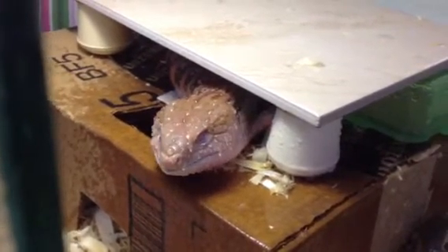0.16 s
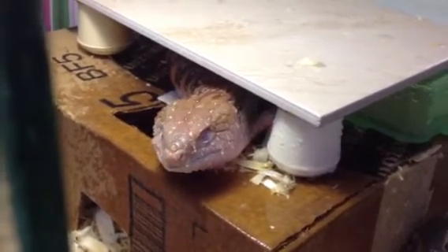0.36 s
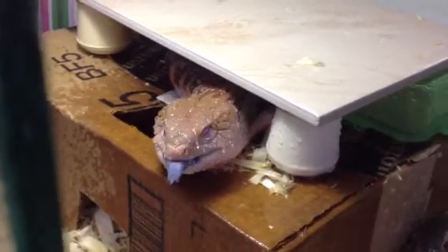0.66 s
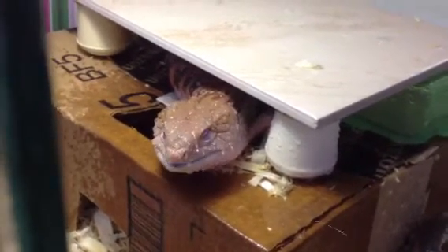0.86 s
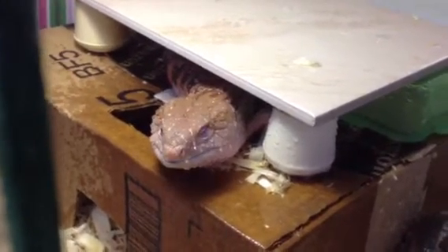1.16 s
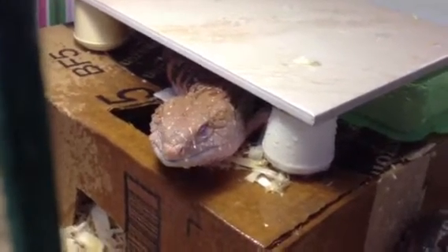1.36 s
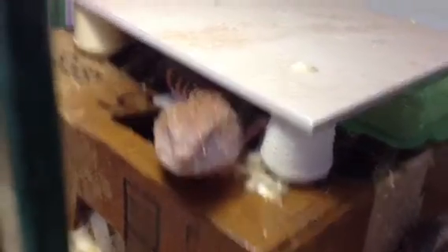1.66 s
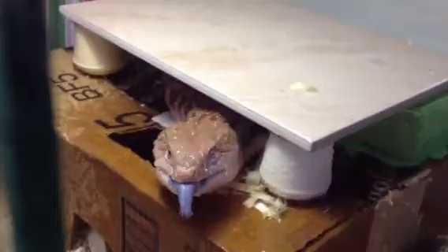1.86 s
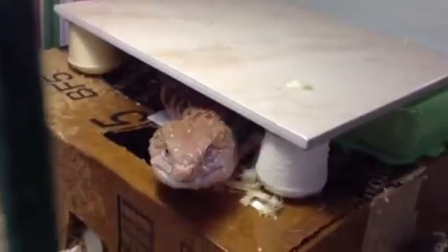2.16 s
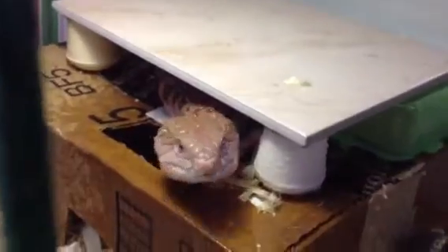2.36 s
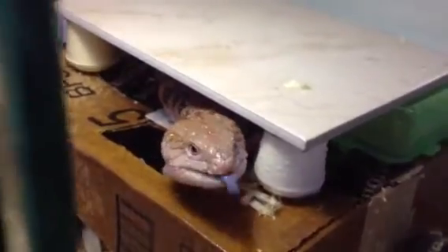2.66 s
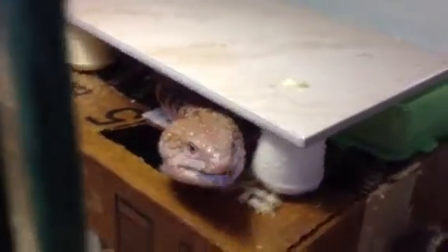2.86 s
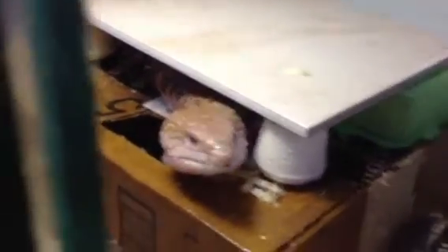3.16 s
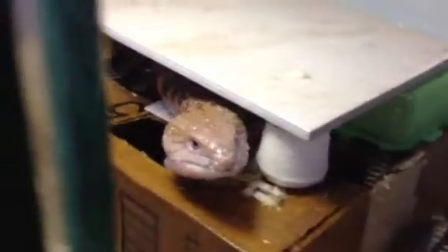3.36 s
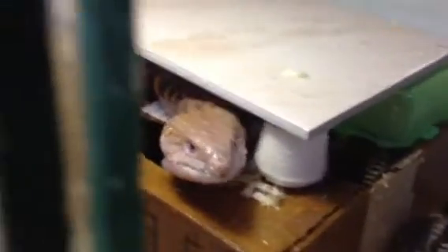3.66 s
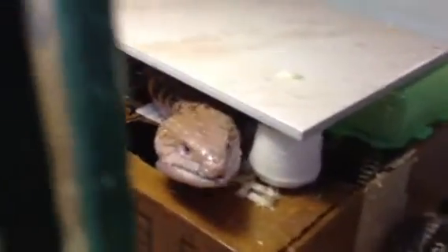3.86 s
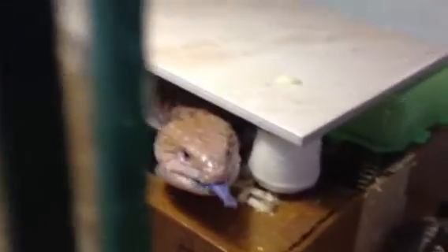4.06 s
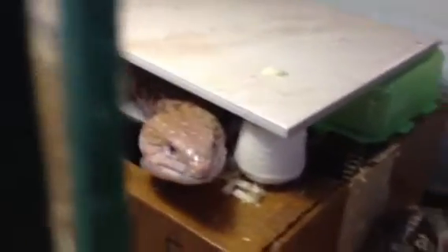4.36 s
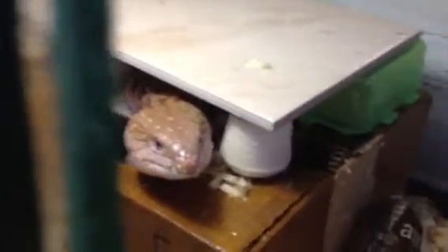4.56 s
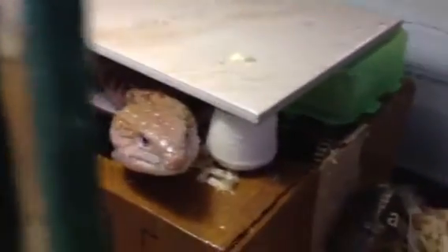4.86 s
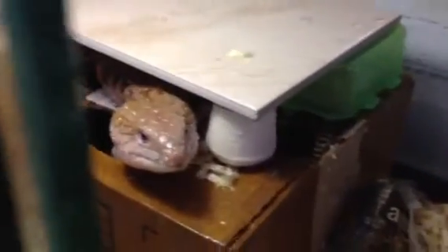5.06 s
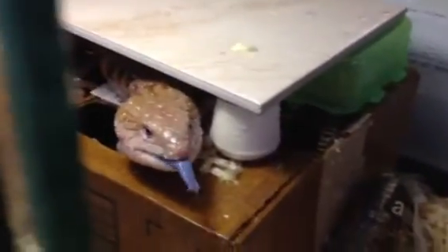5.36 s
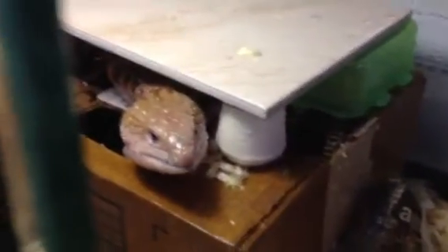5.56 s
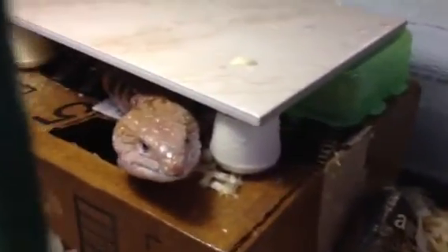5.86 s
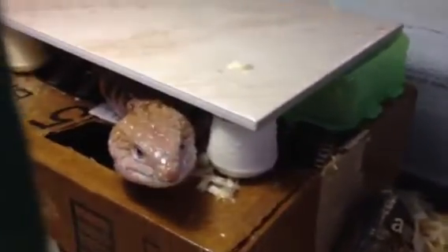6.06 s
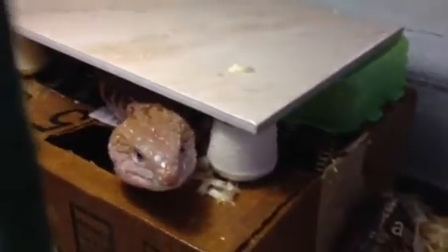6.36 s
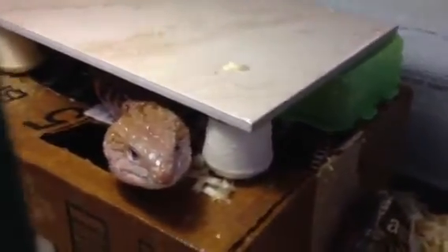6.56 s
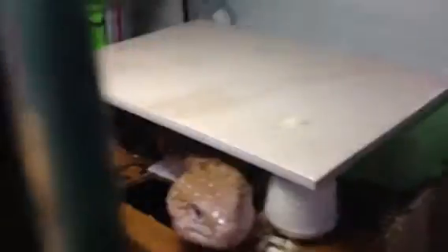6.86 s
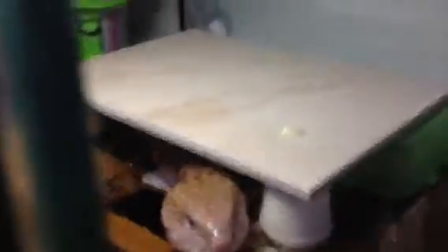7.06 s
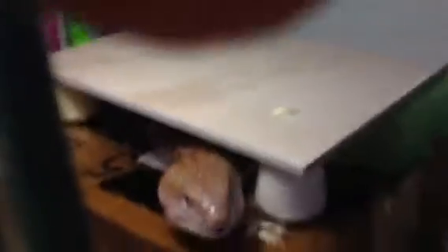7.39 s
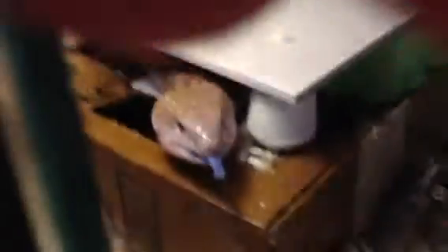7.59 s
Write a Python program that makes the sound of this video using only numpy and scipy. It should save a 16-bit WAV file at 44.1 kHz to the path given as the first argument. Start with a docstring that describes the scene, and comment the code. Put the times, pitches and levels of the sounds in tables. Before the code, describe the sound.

A close capture in a small, slightly reverberant room with a faint steady background. From 0 to 2.5 seconds a hand sprayer gives a smooth, constant, fairly quiet hiss of fine mist, with two soft low taps near 0.4 and 0.5. The valve shuts and the hiss stops quickly. Around 2.6 to 2.9 the plastic bottle is set down in a sharp, loud, tumbling clatter with short scuffs. From 3.3 to 5.0 it is pumped six times, roughly three strokes a second: each has a small click, a rush of rubbing air with a thin, very high whistle and chirp, a loud hollow knock at the bottom, and a rebound click; softer air swishes on the upstrokes, and a few strokes groan briefly. Afterwards come sparse light ticks and faint scuffs, then a firm hollow knock on the enclosure near 7.0 and a lighter one just after, followed by near quiet.

```python
"""A pump-up pressure sprayer is set down with a clatter and pumped six times after misting an enclosure.
Each stroke joins modal impacts (turn, catch, stop, rebound) with seal chirps, a whistle and rushing air.
Before the pumping, the mist is smooth coloured noise, with two soft taps, until the valve shuts.
Contact snaps and ringing modes make the handling ticks and two hollow knocks; scuffs are shaped noise.
Early reflections, a diffuse echo and steady coloured noise make the small room."""
import sys
import numpy as np
from scipy import signal
from scipy.fft import rfft, irfft, next_fast_len
from scipy.io import wavfile

SR = 44100
rng = np.random.default_rng(int(sys.argv[2]) if len(sys.argv) > 2 else 0)


def unload_wav(signal):
    """Save mono or channel-first audio to the path in sys.argv[1] as 16-bit WAV at rate SR, clipped to [-1, 1]."""
    wavfile.write(
        sys.argv[1],
        SR,
        np.round(np.clip(np.atleast_2d(signal).T, -1, 1) * 32767).astype(np.int16),
    )


N = 340893
TIME = np.arange(N) / SR   # s

# pump strokes: [handle turns t/s, plunger stops t/s, rubbing level/dB,
#   nominal peak level/dB of turn, catch, stop and rebound,
#   rising chirp level/dB, lead of the falling chirp before the stop t/s]
PUMP_STROKES = [(3.293, 3.405, -46, -52, -22, -10.5, -32, -45, 0.028),
                (3.672, 3.774, -45, -22, -21, -1, -13, -34.5, 0.014),
                (3.987, 4.091, -43, -27, -23.5, -2, -18, -42, .015),
                (4.272, 4.376, -42.5, -24, -21.5, -2.5, -24, -49.5, 0.013),
                (4.57, 4.688, -40.5, -24, -18.5, -7.5, -20.5, -53.5, 0.027),
                (4.878, 4.9847, -42.5, -32.5, -19, -1.5, -26, -50, 0.025)]
# after the turn the seal grips, then catches; after the stop the rod overruns and rebounds
GRIP_S, CATCH_S = 0.018, 0.038
OVERRUN_S, REBOUND_S = 0.012, 0.029
# the way up starts after a rest and ends just before the next turn
REST_S, PULL_GAP_S, PULL_DB = 0.08, 0.01, -50.5

# modes of the pump barrel, the bottle's shell and the enclosure:
# [f/Hz, level/dB, t60/s], level, pitch and decay before each contact's own variation and ring scale
BARREL_MODES = [(219.8, -6, 0.16), (255.1, -13.5, 0.34), (339.6, 3, 0.11), (413, -6.5, .07),
                (630, -4, 0.049), (708.6, 0.5, 0.095), (815, 5, 0.087), (903, 0.5, 0.12),
                (1017, -1.5, 0.093), (1381, -2, 0.031), (1670, -6, 0.022), (2607, 0.5, 0.042),
                (2846, 1, 0.023), (3540, -10.5, 0.022), (4490, -10.5, .035)]
SHELL_MODES = [(187, -10, 0.16), (323, -10.5, 0.14), (675, -2, 0.045), (955, 1, 0.095), (1021, -3.5, 0.067),
               (1280, -6, 0.063), (1818, -2, 0.054), (2170, 1, 0.02), (2630, -2.5, 0.023), (2553, 8, 0.076),
               (2745, 7, 0.02), (3390, 0, 0.064), (4090, 0, 0.035), (4313, -22, 0.017), (5420, -22, 0.028),
               (6195, 1, 0.049)]
ENCLOSURE_MODES = [(372, -3, 0.13), (663, -6, 0.054), (684, 11, 0.055), (1173, -7, 0.16), (1344, -14, 0.11),
                   (2010, -8, 0.074), (2730, 0, 0.045), (3930, -3.5, 0.036), (4840, -20, 0.036)]
# limits of the bands that set a contact's colour: [f/Hz]
BAND_EDGES_HZ = [100, 500, 1800, 4300, 15500]
# colour of each contact before its brightness tilt: [bass, middle, presence, treble level/dB]
STOP_BANDS = [-4.5, 0.5, -6, -12]
REBOUND_BANDS = [-4, -0.5, 0, -8]
TURN_BANDS = [1, -2.5, -10, -22.5]
CATCH_BANDS = [-6.5, -1.5, 0.5, -8.5]
CLACK_BANDS = [-7, 0.5, 1.5, -14]
KNOCK_BANDS = [-4.5, 1.5, -16, -31.5]

# the bottle's thump under each stop: [f/Hz, level/dB, t60/s], before the stroke's level
THUMP_MODES = [(205.4, -21, 0.19)]
THUMP_FADE_DB_PER_STROKE = 4   # pressure cushions the plunger
THUMP_FOLLOWS = 0.5   # share of the stop's level in dB

# spectra of air passing the seal on the way down and up: [f/Hz, relative level/dB]
PUSH_SPECTRUM = [(30, -39), (100, -0.5), (160, 10), (300, 9), (550, 3.5), (800, 5), (1200, -10), (1850, 2),
                 (2200, -7.5), (4200, -2.5), (6700, -9.5), (10500, -11.5), (13200, -9), (15500, -14.5)]
PULL_SPECTRUM = [(40, -21.5), (150, 8), (500, -2.5), (880, 1.5), (1200, -3.5), (2000, 1), (4200, 2.5),
                 (5300, -3), (6900, 1), (8500, -8.5), (10500, -12), (11700, -7.5), (12700, 2),
                 (13800, -15.5), (15500, -11.5)]
# the seal's chirps: (from Hz, to Hz), before a small waver
CHIRP_UP_HZ = (12300, 13300)
CHIRP_DOWN_HZ = (13100, 12030)
CHIRP_S, CHIRP_DOWN_DB = 0.021, -34
CHIRP_UP_LEAD_S = 0.02   # before the catch
# groans of the seal: [start t/s, length t/s, from f/Hz, to f/Hz, level/dB], pitch before waver
SEAL_GROANS = [(3.345, 0.065, 535, 560, -49.5), (3.61, 0.065, 338, 298, -44), (4.616, .09, 520, 607, -36)]

# mist from the nozzle until the valve shuts: [t/s, level/dB], before a slight flutter
MIST_LEVEL = [(0, -48), (.3, -49), (.37, -46.5), (.44, -48.5), (.9, -48.5), (1.6, -49.5), (2.47, -49.5),
              (2.5, -51), (2.53, -67), (2.6, -110)]
# spectrum of the mist: [f/Hz, relative level/dB]
MIST_SPECTRUM = [(150, -38.5), (300, -7.5), (480, -5), (780, -5.5), (1000, -7.5), (1500, -2.5),
                 (2600, -1.5), (4100, -2.5), (5200, -6.5), (7000, -2), (10000, -6), (15000, -6)]

# clatter and ticks of the handled bottle, and at 3.821 s a second rebound of the plunger: [t/s, nominal peak
# level/dB, brightness level/dB per band]
HANDLING_CLACKS = [(2.637, -26.5, -2.5), (2.731, -23, 5), (2.763, -2.5, 4.5), (2.785, -7.5, 2.5),
                   (2.797, -6, -1), (2.831, -17.5, -2), (2.85, -20.5, -4.5), (2.87, -8.5, 3.5),
                   (2.964, -22, 0), (3.15, -28.5, -5), (3.496, -29, 1), (3.756, -16, -6), (3.821, -20, 7),
                   (5.128, -23.5, 1), (5.177, -32, -7), (5.276, -36.5, -4), (5.377, -22.5, 8.5),
                   (5.465, -37.5, -2), (5.606, -36, -1), (5.696, -34.5, -.5), (6.145, -29, -6),
                   (6.245, -46.5, 17), (6.606, -41.5, -4.5), (6.751, -39.5, -6.5), (6.789, -43, 10),
                   (7.025, -35.5, -1.5)]
# the bottle scuffs along its support and in the hand: [start t/s, end t/s, level/dB], before flutter
SCUFF_STROKES = [(2.54, 2.73, -59.5), (2.72, 2.765, -41), (2.775, 2.875, -46), (5.37, 5.46, -51.5),
                 (5.62, 6.15, -65.5), (7.17, 7.26, -66)]
# spectrum of the scuffs: [f/Hz, relative level/dB]
SCUFF_SPECTRUM = [(30, -45), (100, -6), (190, 7), (400, 5.5), (800, -6), (1050, -5.5), (1600, -1),
                  (2500, 3.5), (3100, -5), (4200, -4), (6800, -10.5), (10000, -14), (15500, -17)]
# heavy contacts shake the surface under the bottle: [t/s, level/dB], before each mode's level
SUPPORT_BUMPS = [(.437, -36.5), (.511, -46), (2.755, -26.5), (2.791, -31.5), (2.869, -31.5), (3.757, -28),
                 (6.148, -49), (6.987, -43)]
# modes of that surface: [f/Hz, level/dB, t60/s]
SUPPORT_MODES = [(95, -10.5, 0.25), (151.1, -1, 0.27), (231, 3.5, 0.12)]
# hollow knocks on the enclosure: [t/s, nominal peak level/dB, brightness level/dB per band]
ENCLOSURE_KNOCKS = [(6.984, -16, 1.5), (7.071, -24, 0.5)]
# two soft taps during the misting: [t/s, level/dB, f/Hz]
SOFT_TAPS = [(.43, -31.5, 400), (.509, -33, 974)]
TAP_T60_S = 0.039

# small nearby surfaces throw back the treble: [delay t/s, level/dB]
EARLY_REFLECTIONS = [(.0011, -24), (.0019, -18), (.0031, -18), (.0047, -16.5), (.0073, -22.5)]
# decay of the room: [f/Hz, t60/s]
ROOM_DECAY = [(150, 0.84), (350, 0.26), (900, 0.4), (3000, 0.4), (7000, 0.4), (12500, 0.9)]
# colour of the room's echo: [f/Hz, level/dB], before the echo's overall level
ECHO_COLOUR = [(80, 1), (190, 1.5), (350, -1.5), (880, -3), (1400, -7), (3000, -1.5), (12000, -6.5)]
ECHO_DB = -13
# spectrum of the room's background: [f/Hz, relative level/dB]
ROOM_SPECTRUM = [(20, -59), (40, -31), (95, -11), (150, -6), (240, -4), (450, -13.5), (900, -12),
                 (1200, -18), (3000, -25.5), (7000, -26), (10000, -27.5), (15500, -27)]
ROOM_TONE_DB = -62.5
# resonances of the microphone's port: [f/Hz, width f/Hz, level/dB at the centre]
PORT_RESONANCES = [(5216, 360, -4), (6800, 340, 2.5), (10000, 1800, -4)]
CUTOFF_HZ = 15450


def pump_contacts():
    """Modal impact: each stroke has a dull turn, a catch, a knock on the stop and a rebound."""
    turn, stop, _, turn_db, catch_db, stop_db, rebound_db, *_ = np.transpose(PUMP_STROKES)
    even = np.zeros(len(PUMP_STROKES))   # no brightness tilt from stroke to stroke
    turns = blows(
        zip(turn, turn_db, even), SHELL_MODES, crest_db=13.5, band_db=TURN_BANDS,
        crack_db=9.5, crack_t60=0.17, crack_hz=7400, snap_db=-6.5,
        rise_s=0.002, contact_s=0.004, ring_scale=0.83, vary_db=6)
    catches = blows(
        zip(turn + CATCH_S, catch_db, even), SHELL_MODES, crest_db=14, band_db=CATCH_BANDS,
        crack_db=19, crack_t60=0.039, crack_hz=8450, snap_db=-8.5,
        rise_s=0.0024, contact_s=0.0035, ring_scale=0.7, vary_db=4.5)
    stops = blows(
        zip(stop, stop_db, even), BARREL_MODES, crest_db=12.5, band_db=STOP_BANDS,
        crack_db=4, crack_t60=0.066, crack_hz=15200, snap_db=3,
        rise_s=0.0043, contact_s=0.006, ring_scale=0.52, vary_db=2.5)
    rebounds = blows(
        zip(stop + REBOUND_S, rebound_db, even), SHELL_MODES, crest_db=12.5, band_db=REBOUND_BANDS,
        crack_db=10, crack_t60=0.098, crack_hz=7400, snap_db=-2.5,
        rise_s=0.002, contact_s=0.0018, ring_scale=0.77, vary_db=4)
    fade_db = THUMP_FADE_DB_PER_STROKE * np.arange(len(PUMP_STROKES))
    thumps = bumps(zip(stop, THUMP_FOLLOWS * stop_db - fade_db), THUMP_MODES)
    return turns + catches + stops + rebounds + thumps


def pushes():
    """Sliding contact: the seal travels from its grip to just past the stop (start s, end s, level dB)."""
    return [(turn + GRIP_S, stop + OVERRUN_S, rub_db) for turn, stop, rub_db, *_ in PUMP_STROKES]


def pulls():
    """Return stroke: the plunger rises between a stop and the next turn (start s, end s, level dB)."""
    pairs = zip(PUMP_STROKES, PUMP_STROKES[1:])
    return [(last[1] + REST_S, coming[0] - PULL_GAP_S, PULL_DB) for last, coming in pairs]


def pump_air():
    """Friction and turbulent flow: the seal rubs roughly going down, air swishes past it going up."""
    push_level = strokes(pushes(), roundness=0.24) * from_db(1.8 * flutter(220))
    pull_level = strokes(pulls(), roundness=1) * from_db(0.85 * flutter(100))
    air = push_level * noise(PUSH_SPECTRUM) + pull_level * noise(PULL_SPECTRUM)
    return patchy(air, patchy_db=3.5, rate=50)


def whistle(slow_hz=12100, fast_hz=13900, spread_hz=520, level_db=-6):
    """Frequency modulation: an airy whistle arches up and down as each push speeds up and slows."""
    speed = strokes([(start, end, 0) for start, end, _ in pushes()], roundness=0.34)
    hz = slow_hz + (fast_hz - slow_hz) * speed + spread_hz * flutter(3000)
    level = from_db(level_db + 4 * flutter(300)) * strokes(pushes(), roundness=0.27)
    return level * np.sin(2 * np.pi * np.cumsum(hz) / SR)


def chirps():
    """Stick-slip: the seal chirps upward as it catches, downward before the stop, and groans more roughly."""
    rising = [(turn + CATCH_S - CHIRP_UP_LEAD_S, CHIRP_S, *CHIRP_UP_HZ, db)
              for turn, *_, db, _lead in PUMP_STROKES]
    falling = [(stop - lead, CHIRP_S, *CHIRP_DOWN_HZ, CHIRP_DOWN_DB)
               for _turn, stop, *_, lead in PUMP_STROKES]
    squeaks = glides(rising + falling, waver=0.02, rate=1800)
    return squeaks + glides(SEAL_GROANS, waver=0.16, rate=560)


def mist():
    """Jet atomisation: water breaking up in the nozzle is a smooth noise that follows the flow."""
    level_db = np.interp(TIME, *np.transpose(MIST_LEVEL))
    return from_db(level_db + 0.38 * flutter(40)) * noise(MIST_SPECTRUM)


def clacks():
    """Modal impact: the handled bottle's shell rings briefly at each clack."""
    return blows(
        HANDLING_CLACKS, SHELL_MODES, crest_db=14, band_db=CLACK_BANDS,
        crack_db=9.5, crack_t60=0.089, crack_hz=7400, snap_db=-4,
        rise_s=0.002, contact_s=0.0023, ring_scale=0.62, vary_db=2.5)


def scuffs():
    """Sliding friction: many fine contacts make a fluttering noise."""
    level = strokes(SCUFF_STROKES, roundness=0.35) * from_db(2.1 * flutter(260))
    return level * noise(SCUFF_SPECTRUM)


def knocks():
    """Modal impact: a firm knock on the hollow enclosure and a lighter one after it."""
    return blows(
        ENCLOSURE_KNOCKS, ENCLOSURE_MODES, crest_db=9, band_db=KNOCK_BANDS,
        crack_db=8, crack_t60=0.089, crack_hz=5970, snap_db=-8,
        rise_s=0.0006, contact_s=0.0053, ring_scale=0.65, vary_db=2)


def taps():
    """Damped resonance: each soft tap rings briefly at a pitch of its own."""
    return sum(bumps([(s, db)], [(hz, 0, TAP_T60_S)]) for s, db, hz in SOFT_TAPS)


def blow(modes, crack_db, crack_t60, crack_hz, rise_s, contact_s, ring_scale, snap_db, vary_db,
         snap_t60=0.0033):
    """Modal excitation: a sharp snap, a gritty crack, and modes that swell while the surfaces touch."""
    t = TIME[:SR // 5]
    envelope = from_db(-60 * t / crack_t60) + from_db(snap_db - 60 * t / snap_t60)
    grit = envelope * rng.standard_normal(len(t))
    out = from_db(crack_db) * band(grit, 130, crack_hz)
    free = np.maximum(t - contact_s, 0)   # the ring dies only once the surfaces part
    for hz, db, t60 in modes:
        mode_hz = hz * (1 + 0.017 * rng.normal())
        tone = np.sin(2 * np.pi * (mode_hz * t + rng.random()))
        swell = 1 - np.exp(-(t / (rise_s * np.sqrt(1000 / hz))) ** 2)   # low modes swell more slowly
        decay = from_db(db + vary_db * rng.normal() - 60 * free / (t60 * ring_scale))
        out = out + swell * decay * tone
    return out


def blows(table, modes, crest_db, band_db, **contact):
    """Spectral tilt: each blow's brightness raises successive bands in equal steps."""
    out, head = np.zeros(N), SR // 50
    for s, peak_db, bright_db in table:
        raw = blow(modes, **contact)
        hit = 0
        for k, (low, high) in enumerate(zip(BAND_EDGES_HZ, BAND_EDGES_HZ[1:])):
            part = band(raw, low, high)
            hit = hit + from_db(band_db[k] + k * bright_db) * part / np.std(part[:head])
        # a fixed crest factor turns the nominal peak into the rms of the first 10 ms
        add(out, s, from_db(peak_db - crest_db) * hit / np.std(hit[:head // 2]))
    return out


def bumps(table, modes, rise_cycles=2.4, second_db=-6, second_ratio=1.17):
    """Damped mode pairs: soft contacts wake a few modes, each with a weaker, lower partner."""
    t, ring = TIME[:SR // 2], 0
    for hz, db, t60 in modes:
        pair = np.sin(2 * np.pi * hz * t)
        pair = pair + from_db(second_db) * np.sin(2 * np.pi * hz / second_ratio * t)
        rise = 1 - np.exp(-t * hz / rise_cycles)
        ring = ring + from_db(db - 60 * t / t60) * rise * pair
    out = np.zeros(N)
    for s, db in table:
        add(out, s, from_db(db) * ring)
    return band(out, 60, 3000, order=2)


def strokes(table, roundness):
    """Sliding speed: the level of a stroke rises from rest and falls back to it."""
    out = np.zeros(N)
    for start, end, db in table:
        progress = np.linspace(0, 1, max(round((end - start) * SR), 2))
        arch = 4 * progress * (1 - progress)
        add(out, start, from_db(db) * arch ** roundness)
    return out


def glides(table, waver, rate):
    """Frequency glide: a short tone's pitch slides while wavering at random."""
    out, unsteady = np.zeros(N), 1 + waver * flutter(rate)
    for s, length, from_hz, to_hz, db in table:
        size = round(length * SR)
        hz = np.linspace(from_hz, to_hz, size) * unsteady[round(s * SR):][:size]
        tone = np.sqrt(2) * np.sin(2 * np.pi * np.cumsum(hz) / SR)
        add(out, s, from_db(db) * np.hanning(size) * tone)
    return out


def patchy(x, patchy_db, rate):
    """Turbulence: all below 500 Hz, and each third of an octave above, swells and fades by itself."""
    size, out = next_fast_len(N), 0
    spectrum, hz = rfft(x, size), np.fft.rfftfreq(size, 1 / SR)
    edges = np.append(0, np.geomspace(500, SR / 2, 17))
    for low, high in zip(edges, edges[1:]):
        part = irfft(spectrum * ((hz >= low) & (hz < high)), size)[:N]
        out = out + part * from_db(patchy_db * flutter(rate))
    return out


def noise(spectrum):
    """Spectral shaping: white noise filtered to a given colour, at rms 1."""
    size = next_fast_len(N)
    db = at_hz(spectrum, np.fft.rfftfreq(size, 1 / SR))
    white = rng.standard_normal(size)
    return rms_one(irfft(rfft(white) * from_db(db), size)[:N])


def flutter(rate):
    """Random modulation: straight lines join normal draws of unit spread, `rate` a second."""
    knots = np.arange(0, N / SR + 1, 1 / rate)
    return np.interp(TIME, knots, rng.standard_normal(len(knots)))


def from_db(db):
    """Logarithmic level: decibels to amplitude gain."""
    return 10 ** (np.asarray(db) / 20)


def rms_one(x):
    """Mean power: scale a signal to unit rms."""
    return x / np.sqrt(np.mean(x ** 2) + 1e-20)


def at_hz(points, hz):
    """Logarithmic pitch: interpolate a table along log frequency."""
    points = np.array(points)
    return np.interp(np.log(np.maximum(hz, 1)), np.log(points[:, 0]), points[:, 1])


def band(x, low_hz, high_hz, order=3):
    """Band limitation: a causal band-pass filter."""
    sos = signal.butter(order, [low_hz, high_hz], "band", fs=SR, output="sos")
    return signal.sosfilt(sos, x)


def add(track, s, sound):
    """Superposition: mix a sound into a track at a time in seconds."""
    start = max(round(s * SR), 0)
    track[start:start + len(sound)] += sound[:N - start]


def reflected(x, lowest_hz=2500):
    """Comb filtering: early reflections put a fine ripple on the treble."""
    out, treble = x.copy(), band(x, lowest_hz, CUTOFF_HZ, order=2)
    for delay, db in EARLY_REFLECTIONS:
        add(out, delay, from_db(db) * treble)
    return out


def room(x, first_echo_s=0.0061, moves_per_s=6, count=4):
    """Diffuse reverberation: decaying noise in bands, its pattern shifting as the bottle moves."""
    t, echoes = TIME[:SR // 2], 0
    edges = np.geomspace(60, 16000, 13)
    for low, high in zip(edges, edges[1:]):
        hz = np.sqrt(low * high)
        tails = band(rng.standard_normal((count, len(t))), low, high)
        tails = tails * from_db(-60 * t / at_hz(ROOM_DECAY, hz))
        tails = tails * np.clip(t / first_echo_s - 1, 0, 1)   # silent until the first echo
        band_share = np.sqrt(2 * (high - low) / SR / len(t))
        echoes = echoes + from_db(at_hz(ECHO_COLOUR, hz)) * rms_one(tails) * band_share
    place, out = moves_per_s * TIME, 0
    for k, echo in enumerate(echoes):
        # each pattern fades into the next, in a cycle
        share = np.sqrt(np.clip(1 - abs((place - k) % count - 1), 0, 1))
        out = out + signal.oaconvolve(x * share, echo)[:N]
    return out


def room_tone():
    """Stationary noise: the room's steady background."""
    return from_db(ROOM_TONE_DB) * noise(ROOM_SPECTRUM)


def scene():
    """Superposition: direct sound with early reflections, diffuse echo and background."""
    pump = pump_contacts() + pump_air() + whistle() + chirps()
    handling = clacks() + scuffs() + bumps(SUPPORT_BUMPS, SUPPORT_MODES)
    near = pump + handling + knocks() + taps()
    direct = reflected(near + mist())
    echo = from_db(ECHO_DB) * room(near)   # the mist is left out of the echo
    return (direct + echo + room_tone())[None]


def record(dry):
    """Port resonance: the microphone's port adds two dips and a hump; the top is cut steeply."""
    for hz, width, db in PORT_RESONANCES:
        peak = signal.lfilter(*signal.iirpeak(hz, hz / width, fs=SR), dry)
        dry = dry + (from_db(db) - 1) * peak
    return signal.sosfilt(signal.ellip(12, 0.1, 80, CUTOFF_HZ, fs=SR, output="sos"), dry)


dry = scene()
out = record(dry)
unload_wav(out)
```